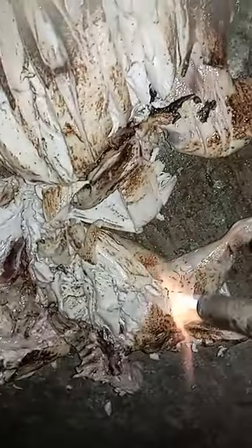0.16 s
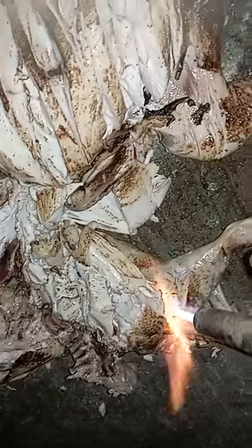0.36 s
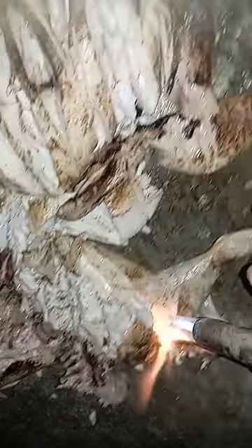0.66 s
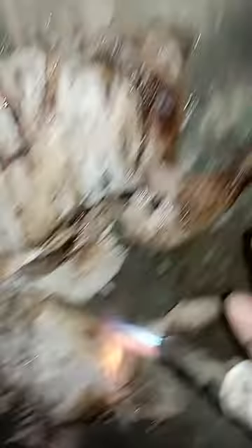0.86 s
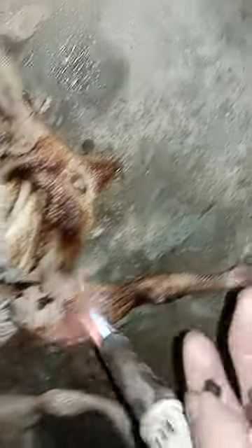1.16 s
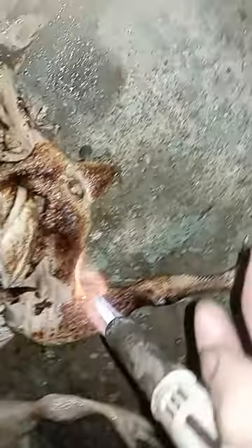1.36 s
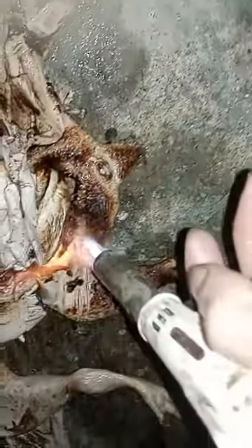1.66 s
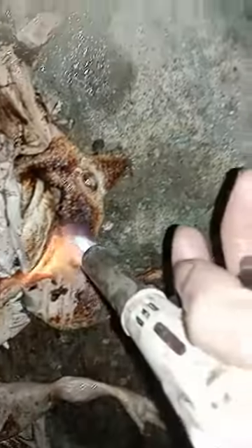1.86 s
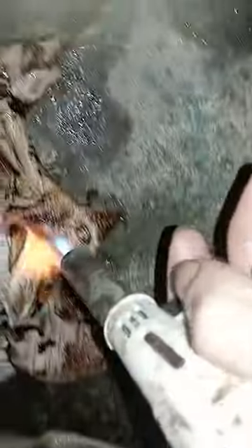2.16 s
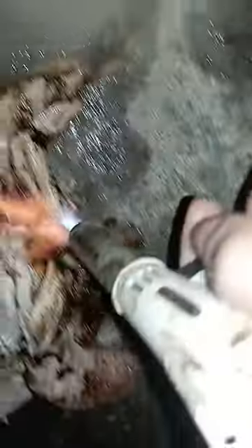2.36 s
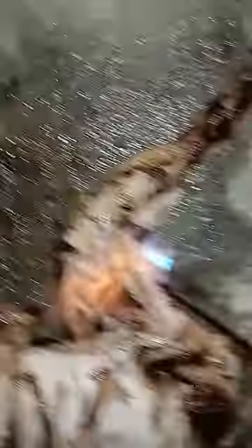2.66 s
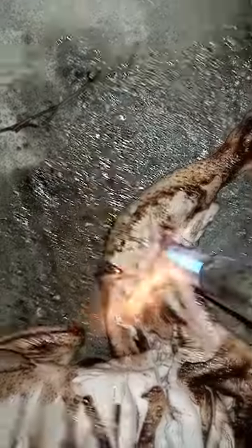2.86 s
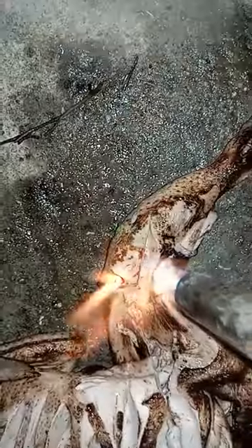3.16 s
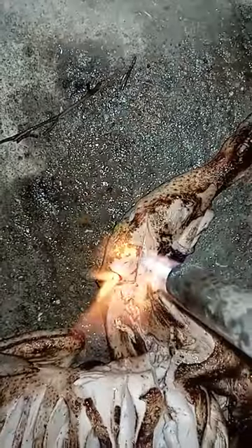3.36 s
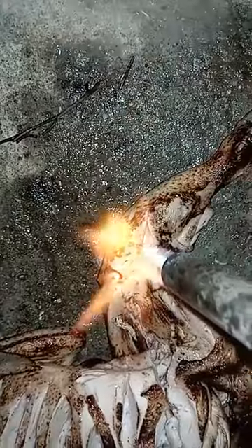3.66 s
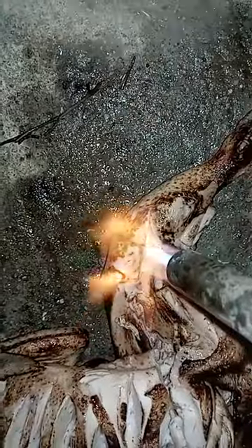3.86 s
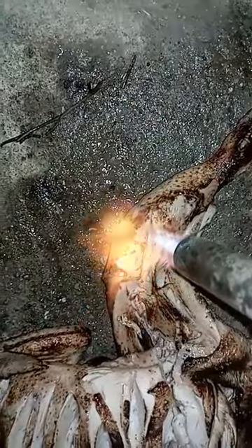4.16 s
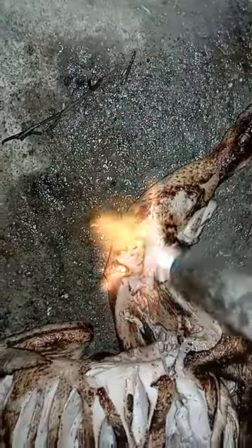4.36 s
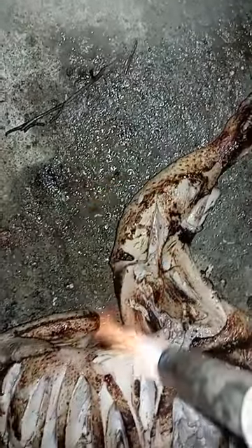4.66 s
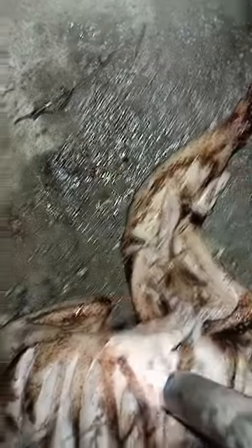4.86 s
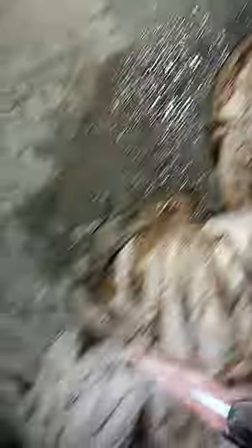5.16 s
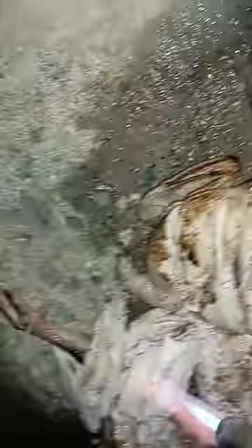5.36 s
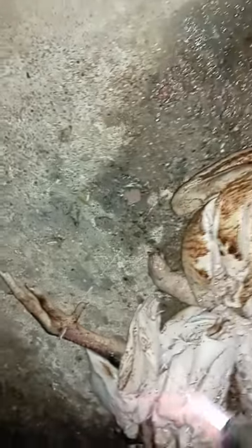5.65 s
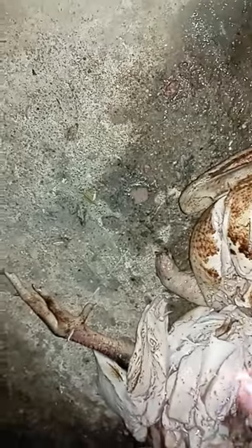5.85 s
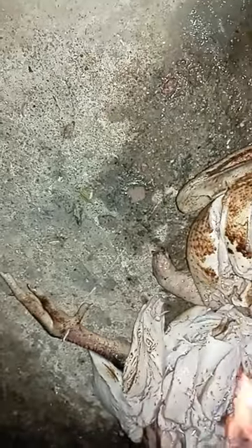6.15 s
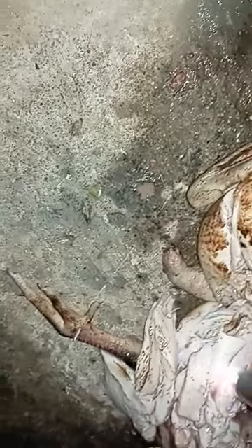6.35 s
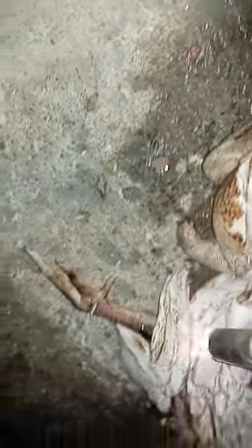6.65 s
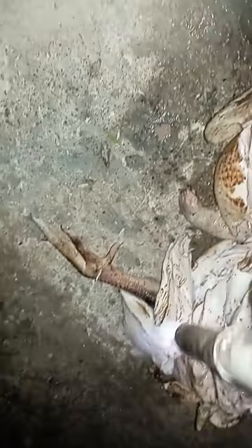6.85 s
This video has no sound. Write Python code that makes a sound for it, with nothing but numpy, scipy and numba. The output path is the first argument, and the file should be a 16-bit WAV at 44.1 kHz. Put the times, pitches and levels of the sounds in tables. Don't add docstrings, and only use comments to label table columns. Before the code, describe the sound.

A gas torch roars low and hisses without a break as its flame singes skin on a concrete floor. Fat snaps and ticks busily at first, then calms; steam bursts out at about two seconds with small squeaks. Crackling returns in the middle, and another sharp puff comes later. Close handheld stereo between hard walls, its tone shifting as the hand moves.

```python
import sys
import numpy as np
from scipy import signal
from scipy.fft import rfft, irfft
from scipy.io import wavfile
from scipy.ndimage import map_coordinates
from numba import njit

SR = 44100
rng = np.random.default_rng(int(sys.argv[2]) if len(sys.argv) > 2 else 0)


def store_wav(level_fs):
    pcm = np.round(np.clip(np.atleast_2d(level_fs), -1, 1) * 32767)
    wavfile.write(sys.argv[1], SR, pcm.T.astype(np.int16))


def to_linear_factor(level_db):
    exponent = np.asarray(level_db, float) / 20
    return 10 ** exponent


N = 308259

# t/s, roar level/dB, bite on the surface/dB
FLAME = [(0, -37.5, 6.5), (.45, -34.5, -3.5), (.7, -36, -1.5), (1.03, -34.5, 3), (1.5, -35, 0.5),
         (1.9, -34.5, 0.5), (2.2, -32, -12), (2.5, -33.5, 9.5), (2.9, -31, 7.5), (3.6, -32, 10.5),
         (4.0, -32.5, 10.5), (4.4, -31, 11.5), (4.9, -33, 9), (5.3, -34.5, 0.5), (5.7, -33, -31),
         (6.3, -35, -9), (6.65, -32, -9), (6.99, -39, -17)]
# t/s, sizzle level/dB, vapour level/dB, left minus right/dB
SKIN = [(0, -55.5, -50.5, -8), (.45, -50.5, -52, -4), (.78, -51.5, -52.5, -6), (1.0, -56, -52.5, -2),
        (1.55, -56.5, -53, -2), (1.9, -53, -48, -7), (2.4, -54, -50, -8), (2.65, -55, -46.5, -3),
        (3.1, -51.5, -47.5, -3), (3.8, -53.5, -49, -6.5), (4.1, -52.5, -50.5, -5), (4.55, -53, -48, -7.5),
        (4.9, -54, -50, 1.5), (5.3, -57, -53, -1.5), (5.9, -60, -53, -4), (6.2, -56.5, -54, -6.5),
        (6.6, -57.5, -52.5, -2), (6.99, -59.5, -49, -6)]
# t/s, lag of the farther right port/ms, share of its whole path travelled/0-1
LAG = [(0, .185, 0), (.8, .19, .07), (1.2, .27, .2), (1.9, .22, .28), (2.6, .18, .45), (3.1, .2, .53),
       (4.6, .2, .6), (5.0, .25, .7), (5.45, .29, .8), (5.9, .26, .9), (6.99, .24, 1)]
# f/Hz, density/dB per Hz
ROAR = [(20, -64), (35, -38), (70, -23.5), (130, -6), (200, 1), (300, -1), (450, -3.5), (650, -11),
        (900, -20), (1300, -21)]
# f/Hz, density/dB per Hz
BODY = [(300, 0), (450, -7), (600, 6.5), (750, -3.5), (900, -13), (1200, -13)]
# f/Hz, density/dB per Hz
EDGE = [(600, -15.5), (850, 3), (1100, 2), (1400, -0.5), (1800, -11.5), (2300, -27), (3000, -61)]
# f/Hz, density/dB per Hz
JET = [(1100, 0.5), (1800, 8), (2500, 3), (3300, 2), (4500, -3.5), (6000, -9), (9000, -6), (12000, -9),
       (16000, -50)]
# f/Hz, density/dB per Hz
SIZZLE = [(3000, -10), (5000, -6.5), (7000, -1.5), (8800, -9), (10200, 0.5), (10700, -9), (12000, -2),
          (13000, -10.5), (16000, -12)]
# f/Hz, density/dB per Hz
SPIT = [(10500, -20), (12500, -2), (16000, -1)]
# t/s, f/Hz
HISS_PITCH = [(0, 8000), (1.0, 7830), (1.4, 7500), (2.0, 7800), (2.4, 8060), (2.8, 7600), (3.6, 7700),
              (4.4, 7560), (4.7, 7800), (5.1, 8000), (5.4, 7600), (5.8, 7750), (6.4, 7700), (6.7, 8340),
              (6.99, 7800)]
# f/Hz, density/dB per Hz
STEAM = [(450, -21), (800, -11.5), (1500, -4), (2300, -4), (3200, -0.5), (4300, -3), (5800, -6),
         (7800, 1.5), (10000, -7.5), (12500, -22), (15000, -37)]
# t/s, rise/s, fall by 60 dB/s, rms level/dB, knock above the steam/dB
BURSTS = [
    (2.066, .007, 0.5, -33.5, -1),
    (2.105, .012, 0.4, -42, -22),
    (1.196, .02, 0.68, -49, -10),
    (2.308, 0.01, 1, -47, 8),
    (5.586, 0.012, 0.22, -28, -7),
    (5.6, .015, .6, -33, -25),
]
# t/s, length/s, f/Hz, width/Hz, rms level/dB
WHISTLES = [
    (1.85, .078, 2590, 60, -52),
    (1.952, 0.046, 2590, 40, -51),
    (2.315, 0.055, 6850, 200, -50),
    (2.39, .04, 6900, 200, -51),
    (2.569, 0.065, 6900, 200, -49.5),
    (2.59, .04, 4900, 250, -55),
    (2.7, .1, 4900, 600, -53),
    (5.46, 0.05, 2020, 120, -59),
    (5.45, 0.13, 2940, 350, -60),
    (5.738, 0.094, 3020, 200, -58),
]
# t/s, peak level/dB, left minus right/dB, dull part level/dB
POPS = [(0.06, -27, -6, -17), (0.1136, -28, -12, -39), (0.163, -25, -8, -20), (0.194, -23, -8, -20),
        (0.2986, -21.5, -4.5, -9.5), (0.3992, -27, 1, -15), (0.4678, -23, -5, -38), (0.576, -21.5, 1, -18),
        (0.632, -29, 17, -42), (0.758, -27, 2, -31), (0.7795, -29, 9, -21), (0.828, -29.5, 6, -20),
        (0.865, -27, 1, -18), (1.8361, -29.5, -6, -28), (2.3172, -42, -28, -18), (3.667, -20.5, 1, -18),
        (3.932, -31.5, -12, -28), (4.08, -29, 5, -24), (4.1399, -23, -11, -27), (4.2162, -29, -3, -26),
        (4.226, -27, -1, -24), (4.5306, -34, 10, -58), (4.5434, -32, 8, -20), (4.697, -31.5, 14, -20),
        (4.8817, -41, 19, -19), (6.118, -31.5, 7, -26), (6.2193, -33, 2, -30)]
# t/s, peak level/dB, left minus right/dB
TICKS = [(0.0903, -38, -4), (0.1815, -33, -7), (0.2045, -35, -5), (0.2385, -35, -8), (0.254, -38, -5),
         (0.316, -36, -3), (0.4035, -28, -2), (0.427, -32, -2), (0.4975, -33, -5), (0.5405, -30, 0),
         (0.5705, -30, 0), (0.645, -32, 0), (3.641, -38, -13), (3.772, -32, -4), (4.129, -25, -4),
         (4.312, -29, -6), (4.766, -38, 4), (4.245, -32, -5), (0.2324, -34, -2.0), (0.3386, -29, -6),
         (0.39, -24, -1.0), (0.4444, -34, 0), (0.4814, -25, -6), (0.4894, -27, -3.5), (0.5183, -29, 0),
         (0.5974, -28, 4), (0.6104, -29, -0.5), (0.6714, -26, 3), (0.7113, -29, 3), (0.9124, -29, -8),
         (0.9314, -46, -7), (2.6524, -41, 2.5), (2.6888, -48, 1), (2.7162, -38, 2.5), (2.7576, -36, 7),
         (2.797, -42, 21), (3.033, -44, -27), (3.2061, -24, 1), (3.4052, -26, 7), (3.721, -27.5, -9),
         (3.8636, -29, -9), (3.9639, -26, -1.0), (4.0373, -28, -8), (4.3044, -32, -1.0), (4.3884, -28, -1),
         (4.416, -24, -1.5), (4.5364, -31, -15), (4.5744, -28, 4), (4.6284, -34, -1), (4.7237, -33, 14),
         (4.7521, -28, 8), (4.79, -38, 7), (4.824, -33.5, 14), (4.8484, -37, 0), (5.885, -40, 0),
         (6.105, -30, 3.0), (6.1604, -38, 5), (6.2013, -34, 0.0), (6.2532, -30.5, 9), (6.2811, -34, 11),
         (6.334, -37, 9), (6.4682, -37, -14), (6.8962, -41, 25)]
# t/s, peak level/dB, left minus right/dB
CRACKS = [(0.0603, -40, -8.0), (0.1141, -34, -5), (0.164, -41, -10.5), (0.194, -40, -7.5),
          (0.2334, -43, -7.0), (0.2987, -48, -6.5), (0.5766, -36, 1.0), (0.632, -42, -5.0),
          (0.8285, -45, -1.5), (3.6671, -27, -5.0), (4.1405, -23, -9.0), (4.2168, -19, -4),
          (4.3044, -38, -10), (4.5765, -40, -14), (4.6972, -30, 4), (4.8823, -42, -2), (6.118, -43, -3)]
# delay/s, level/dB
POP_ECHOES = [
    (.0014, -6),
    (.0027, -17),
    (.004, -11),
    (.0062, -17),
]
# from t/s, to t/s, first f/Hz, last f/Hz, level/dB
NOTCH_LEFT = [(-.2, 0.89, 300, 320, -5.5), (-.2, 1.05, 950, 1080, -9), (-.2, 0.991, 1770, 1750, -17),
              (1.1, 2.004, 1220, 1140, -12), (1.1, 2.203, 373, 386, -12), (2.29, 5.093, 426, 427, -51),
              (2.3, 4.95, 774, 807, -29), (2.31, 3.2, 1270, 1410, -3), (3.194, 4.897, 1410, 1360, -31),
              (2.6, 4.6, 1990, 2090, -1), (4.95, 5.55, 770, 1030, -0.5), (4.902, 5.598, 2270, 2333, 0),
              (5.11, 7.2, 350, 423, -13), (5.8, 7.2, 770, 830, -2), (5.8, 7.2, 1790, 1810, 2)]
# from t/s, to t/s, first f/Hz, last f/Hz, level/dB
NOTCH_RIGHT = [(0.77, 1.24, 340, 455, -29), (-0.85, 1.2, 1200, 1400, -43), (1, 1.57, 760, 1040, -24),
               (1.5, 2, 870, 910, -80), (2, 4.83, 560, 587, -21), (-18, 1.8, 1200, 2840, -55),
               (2, 4.67, 960, 1016, -42), (2.5, 4.75, 1210, 1230, -21), (4.5, 5.9, 1650, 2500, -5.5),
               (4.5, 7.05, 530, 510, -41), (4.5, 6.64, 1520, 1130, -43), (10, 7.9, 900, 1980, -8),
               (6.5, 7.9, 3600, 600, -18)]
# from t/s, to t/s, first f/Hz, last f/Hz, level/dB
HIGH_LEFT = [(-.2, .9, 4900, 4900, 3), (.9, 2.0, 6200, 6100, -5), (2.2, 4.8, 6200, 6200, -4),
             (2.7, 4.7, 4900, 4950, 4), (3.2, 5.1, 8200, 8100, 4), (5.8, 6.85, 4500, 4600, 8),
             (5.85, 6.25, 3300, 3300, -6), (5.75, 6.6, 8400, 8400, 4), (1.2, 1.6, 3000, 3000, -4),
             (2.2, 2.8, 4200, 4100, -4), (.95, 2.8, 10600, 10600, -3), (4.9, 7.2, 10600, 10600, -3),
             (-.2, .9, 8800, 8800, 3), (6.8, 7.2, 7000, 7200, 4)]
# from t/s, to t/s, first f/Hz, last f/Hz, level/dB
HIGH_RIGHT = [(-.2, .95, 8800, 8750, 6), (-.2, .9, 7400, 7350, 4), (-.2, .95, 9900, 9900, 4),
              (1.1, 1.6, 7900, 7600, 8), (1.55, 2.05, 9900, 10000, 7), (1.5, 2.0, 8500, 9400, 5),
              (2.6, 4.6, 7500, 7750, 6), (2.85, 3.3, 8600, 8800, 9), (3.3, 4.0, 8600, 9000, 5),
              (4.0, 4.65, 9200, 8700, 9), (2.7, 4.6, 10000, 10000, 5), (4.65, 5.55, 8150, 7600, 10),
              (6.05, 6.35, 8900, 8900, 9), (6.3, 6.75, 8150, 7900, 8), (6.85, 7.2, 7750, 7700, 10),
              (5.8, 6.1, 7500, 7500, 4), (2.3, 3.1, 4100, 4500, -7), (3.05, 4.35, 4800, 4750, -16),
              (1.0, 1.55, 4600, 4400, -6), (4.9, 5.55, 4300, 4300, -4), (2.7, 4.5, 3900, 3900, 3),
              (1.0, 1.55, 6500, 6500, -4)]
# from t/s, to t/s, first f/Hz, last f/Hz, level/dB
OUT_OF_STEP = [(-.2, .8, 2700, 2700, -22), (.05, .9, 2380, 2250, -20), (1.15, 1.5, 1980, 1980, -10),
               (2.5, 3.0, 3050, 2700, -20), (3.0, 4.65, 2700, 2700, -30), (3.1, 4.65, 2200, 2200, -35),
               (3.4, 4.15, 1600, 1600, -8), (4.9, 5.58, 2320, 1780, -20), (6.08, 6.3, 2700, 2700, -12),
               (6.3, 6.7, 2450, 2450, -8), (-.2, .7, 3000, 2950, -7), (5.15, 5.65, 950, 950, -8),
               (5.75, 7.2, 1180, 1180, -6), (5.75, 7.2, 980, 980, 4), (3.3, 4.6, 2450, 2450, 5),
               (1.5, 2.05, 1550, 1550, 4), (.38, .55, 3950, 3900, -12), (.62, .88, 4050, 3800, -12),
               (-.2, .75, 350, 370, -6), (3.8, 4.5, 520, 520, -6), (3.1, 3.6, 1800, 1800, -5),
               (2.75, 3.0, 3600, 3600, -12), (2.7, 2.95, 1650, 1650, -6), (5.75, 6.4, 1500, 1500, -4),
               (1.2, 1.55, 3000, 3000, -6), (5.72, 6.05, 2550, 2500, -5)]
# f/Hz, width/Hz, level/dB
PORT = [
    [(4940, 1550, 8.5), (7700, 890, 10), (9100, 260, 5)],
    [(7600, 150, -0.5), (8570, 520, 12), (9550, 380, 3.5)],
]


def rms_one(x):
    return x / np.sqrt(np.mean(x ** 2) + 1e-20)


def in_time(rows):
    s, *columns = np.transpose(rows)
    return np.array([np.interp(np.arange(N) / SR, s, c) for c in columns])


def drift(rate_hz):
    r = np.exp(-80 * np.pi * rate_hz / SR)
    chance = rng.standard_normal(N // 40 + 2002)
    slow = signal.lfilter([1], [1, -2 * r, r * r], chance)[2000:]
    return np.interp(np.arange(N) / 40, np.arange(len(slow)), rms_one(slow))


def colour(x, points):
    hz, db = np.transpose(points)
    grid = np.log(np.maximum(np.arange(N // 2 + 1) * SR / N, 1))
    gain = to_linear_factor(np.interp(grid, np.log(hz), db, left=-80, right=-80))
    return rms_one(irfft(rfft(x) * gain, N))


def pair(alike):
    mid, side = rng.standard_normal((2, N))
    alike = np.clip(alike, -1, 1)
    return np.sqrt(1 + alike) * mid + np.sqrt(1 - alike) * side * [[1], [-1]]


def pan(db):
    return to_linear_factor(np.array([db, -db]) / 2)


def resonance(x, hz, width_hz):
    r = np.exp(-np.pi * width_hz / SR)
    feedback = [1, -2 * r * np.cos(2 * np.pi * hz / SR), r * r]
    return signal.lfilter((1 - r * r) / 2 * np.array([1, 0, -1]), feedback, x)


@njit
def moving_band(x, turn, r):
    y = np.zeros(len(x))
    for i in range(2, len(x)):
        drive = (1 - r * r) / 2 * (x[i] - x[i - 2])
        y[i] = drive + 2 * r * np.cos(turn[i]) * y[i - 1] - r * r * y[i - 2]
    return y


def evened(x):
    return rms_one(x / (np.abs(signal.hilbert(x)) + 1e-12) ** .7)


def bandpass(x, order, low_hz, high_hz):
    sos = signal.butter(order, [low_hz, high_hz], "band", fs=SR, output="sos")
    return signal.sosfilt(sos, x + 1e-18)


def cancel(x, table, width_hz, widens_per_khz):
    x = x.copy()
    move_s = 0.12
    for start, end, first_hz, last_hz, db in table:
        t = np.arange(N) / SR
        here = slice(*np.searchsorted(t, [start - move_s, end + move_s]))
        t = t[here]
        share = np.clip(np.minimum(t - start, end - t) / move_s / 2 + .5, 0, 1)
        r = np.exp(-np.pi * (width_hz + widens_per_khz * first_hz / 1000) / SR)
        turn = 2 * np.pi * np.interp(t, [start, end], [first_hz, last_hz]) / SR
        x[here] -= share * (1 - to_linear_factor(db)) * moving_band(x[here], turn, r)
    return x


def echoes_cancel(x):
    left = cancel(x[0], NOTCH_LEFT, 185, 112)
    right = cancel(x[1], NOTCH_RIGHT, 168, 136)
    return np.array([left, right])


def floor_echoes(x):
    left = cancel(x[0], HIGH_LEFT, 520, 0)
    right = cancel(x[1], HIGH_RIGHT, 430, 0)
    return np.array([left, right])


def out_of_step(x):
    mid = cancel(x[0] + x[1], OUT_OF_STEP, 230, 0)
    side = x[0] - x[1]
    return np.array([mid + side, mid - side]) / 2


def arrive(x, scatter_db, decay_s=.05, places=14):
    lag_ms, path = in_time(LAG)
    delayed = map_coordinates(x, [np.arange(N) - lag_ms * SR / 1000], order=3)
    direct = np.array([x, delayed])
    out, place = direct.copy(), path * (places - 1)
    age = np.arange(1200) / SR
    fade = np.minimum(age / .001, 1) * to_linear_factor(-60 * age / decay_s)
    for k in range(places):
        here = slice(*np.searchsorted(place, [k - 1, k + 1]))
        spray = rng.standard_normal((2, 1200)) * fade
        spray *= to_linear_factor(scatter_db) / np.sqrt(np.sum(spray ** 2, axis=1, keepdims=True))
        share = np.cos(np.pi / 2 * (place[here] - k))
        echoes = signal.fftconvolve(direct[:, here], spray, axes=1)
        out[:, here] += share * echoes[:, :len(share)]
    return out / np.sqrt(1 + to_linear_factor(2 * scatter_db))


def ports(x):
    x = x.copy()
    for side, peaks in enumerate(PORT):
        for hz, width_hz, db in peaks:
            x[side] += (to_linear_factor(db) - 1) * resonance(x[side], hz, width_hz)
    return x


def whistles():
    t, out = np.arange(N) / SR, np.zeros((2, N))
    noise, waver = pair(-.5), to_linear_factor(1.5 * drift(30.0))
    for s, length, hz, width_hz, db in WHISTLES:
        here = slice(int((s - .1) * SR), int((s + .3) * SR))
        since = t[here] - s
        tone = evened(resonance(resonance(noise[:, here], hz, width_hz), hz, width_hz))
        shape = np.clip(since / .008, 0, 1) * to_linear_factor(-60 * np.maximum(since - length, 0) / .07)
        out[:, here] += to_linear_factor(db) * waver[here] * shape * tone * pan(7.0)[:, None]
    return out


def bursts():
    t, (steam, knock) = np.arange(N) / SR, np.zeros((2, N))
    for s, rise, t60, db, knock_db in BURSTS:
        rising = np.clip((t - s) / rise, 0, 1)
        falling_s = np.maximum(t - s - rise * (1 + 1.8), 0)
        steam = np.hypot(steam, rising * to_linear_factor(db - 60 * falling_s / t60))
        knock += rising * to_linear_factor(db + knock_db - 60 * falling_s / 0.14)
    spray = arrive(rng.standard_normal(N), scatter_db=3, decay_s=.012, places=90) + .9 * pair(0)
    hollow = evened(resonance(resonance(pair(0.85), 690, 200), 760, 200))
    return steam * to_linear_factor(.6 * drift(80.0)) * colour(spray, STEAM) + knock * hollow


def cracks():
    s, peak_db, pan_db = np.transpose(CRACKS)
    clicks = np.zeros((2, N))
    clicks[:, (s * SR).astype(int) + 55] = to_linear_factor(peak_db + 9.0) * pan(pan_db)
    edge = bandpass(clicks, 2, 11500, 16500)
    return edge + sum(to_linear_factor(db) * np.roll(edge, round(late * SR), axis=1) for late, db in POP_ECHOES)


def pops():
    sharp, dull = np.zeros((2, N))
    ticks = [(s, db - 4, side, -19) for s, db, side in TICKS]
    s, peak_db, pan_db, dull_db = np.transpose(sorted(POPS + ticks))
    at = (s * SR).astype(int) + 55
    sharp[at] = -to_linear_factor(peak_db + 9.5)
    dull[at] = -to_linear_factor(peak_db + dull_db + 26.0)
    direct = bandpass(sharp, 2, 5500, 12000) + bandpass(dull, 1, 900, 4000)
    direct += sum(to_linear_factor(db) * np.roll(direct, round(late * SR)) for late, db in POP_ECHOES)
    both = arrive(direct, scatter_db=-7, decay_s=.025, places=30)
    return both * pan(np.interp(np.arange(N), at, pan_db))


def vapour_hiss(hiss_db):
    hiss_hz = in_time(HISS_PITCH)[0] + 60 * drift(0.46)
    leak = arrive(rng.standard_normal(N), scatter_db=6, decay_s=.025) + .5 * pair(0)
    turn, r = 2 * np.pi * hiss_hz / SR, np.exp(-np.pi * 480 / SR)
    hiss = np.array([moving_band(port, turn, r) for port in leak])
    return to_linear_factor(hiss_db - 10.0 + 1.5 * drift(22.0)) * rms_one(hiss) * pan(6.6)[:, None]


def skin():
    sizzle_db, hiss_db, pan_db = in_time(SKIN)
    hiss = vapour_hiss(hiss_db)
    sizes = to_linear_factor(8.0 * np.minimum(rng.exponential(1, N), 3)) * rng.choice([-1, 1], N)
    bubbles_per_s = 900 * to_linear_factor(3.0 * drift(40.0))
    grains = rms_one(sizes * (rng.random(N) < bubbles_per_s / SR))
    grains = arrive(grains, scatter_db=-2, decay_s=.025)
    vapour = arrive(rng.standard_normal(N), scatter_db=6, decay_s=.025) + .45 * pair(0)
    bite_db = np.maximum(in_time(FLAME)[1], -8)
    spit_db = -74.5 + 2.1 * (sizzle_db - sizzle_db.mean()) + 0.25 * bite_db
    spit = to_linear_factor(spit_db) * colour(1.3 * grains + vapour, SPIT) * pan(-13.0)[:, None]
    sizzle = to_linear_factor(sizzle_db) * colour(0.87 * grains + vapour, SIZZLE) * pan(pan_db)
    return spit + hiss + sizzle


def flame():
    (roar_db, bite_db), sizzle_db = in_time(FLAME), in_time(SKIN)[0]
    swing_db = roar_db - roar_db.mean()
    body_db = -44.5 + swing_db + bite_db
    edge_db = -48.5 + swing_db + 0.097 * bite_db
    jet_db = -51 + 0.31 * swing_db + 0.71 * (sizzle_db - sizzle_db.mean())
    flutter, noise = drift(15.0), rng.standard_normal((4, N))
    roar = to_linear_factor(roar_db + 0.13 * flutter) * colour(noise[0], ROAR)
    roar += to_linear_factor(body_db + 0.5 * flutter) * colour(noise[1], BODY)
    edge = to_linear_factor(edge_db + 0.52 * flutter + 1.0 * drift(19.0)) * colour(noise[2], EDGE)
    jet = arrive(noise[3], scatter_db=2, decay_s=.02) + .33 * pair(0)
    jet = to_linear_factor(jet_db + 2.0 * drift(18.0)) * colour(jet, JET)
    near = arrive(roar, scatter_db=-18) + arrive(edge, scatter_db=-7)
    return echoes_cancel(near + jet)


def scene():
    steady = out_of_step(floor_echoes(flame() + ports(skin())))
    return steady + floor_echoes(ports(pops())) + cracks() + bursts() + whistles()


def low_pass(x):
    return signal.sosfilt(signal.butter(12, 15780, fs=SR, output="sos"), x)


def record(dry):
    return low_pass(dry)


dry = scene()
out = record(dry)
store_wav(out)
```